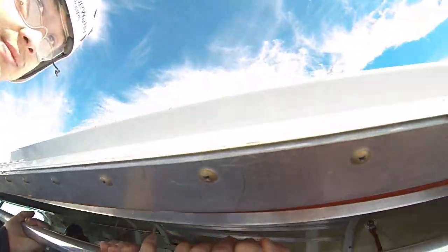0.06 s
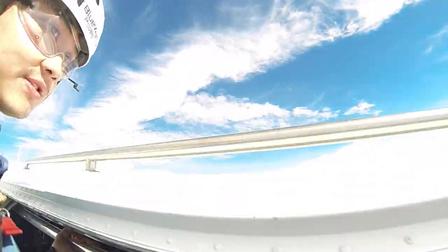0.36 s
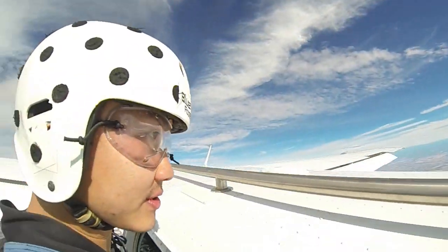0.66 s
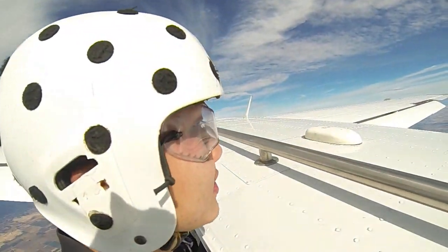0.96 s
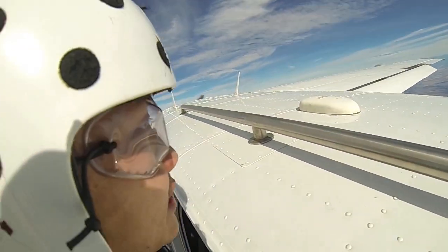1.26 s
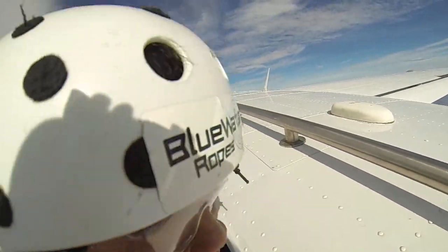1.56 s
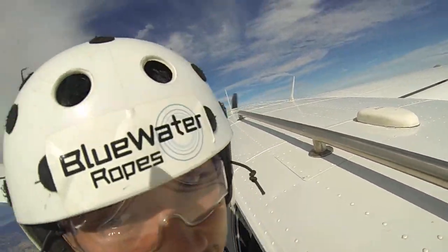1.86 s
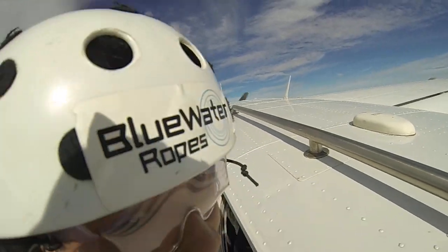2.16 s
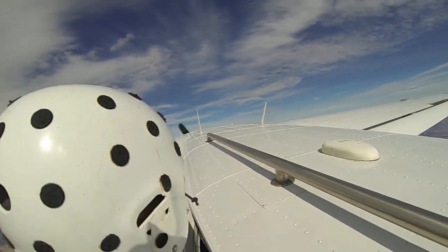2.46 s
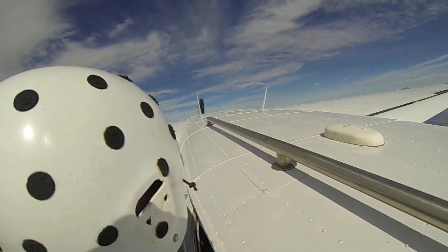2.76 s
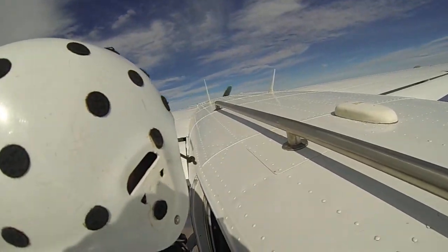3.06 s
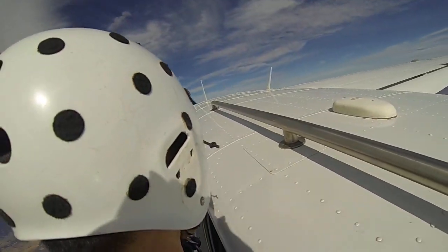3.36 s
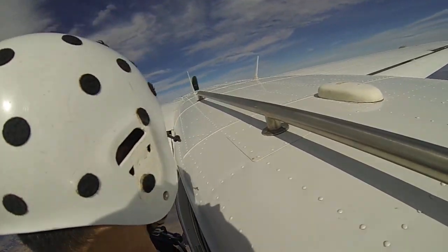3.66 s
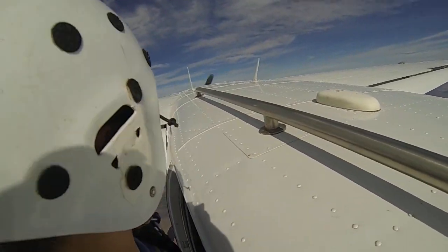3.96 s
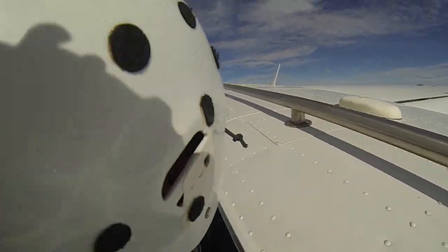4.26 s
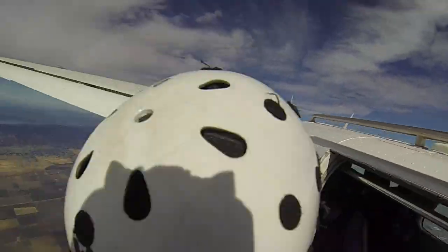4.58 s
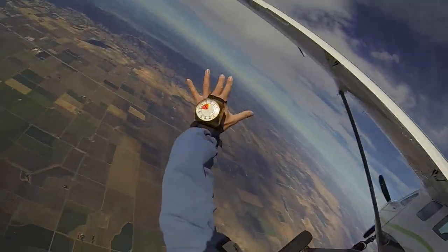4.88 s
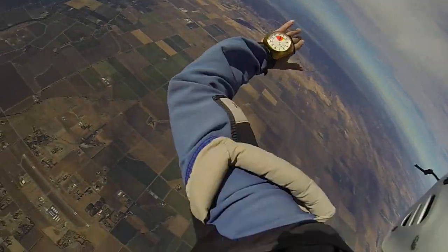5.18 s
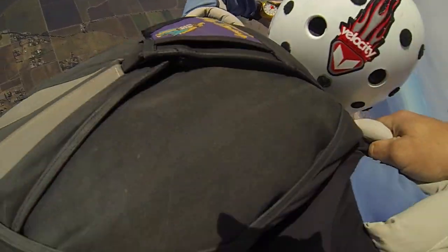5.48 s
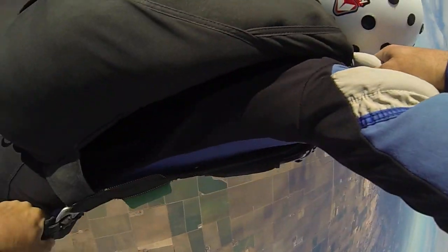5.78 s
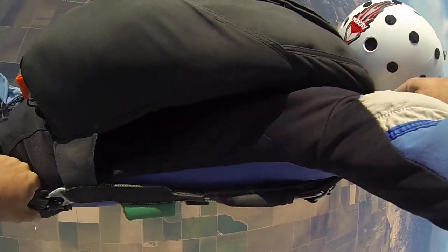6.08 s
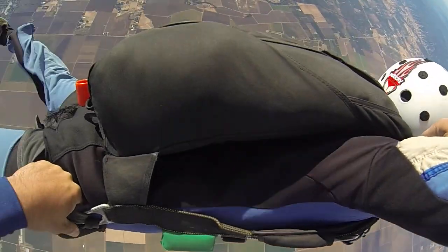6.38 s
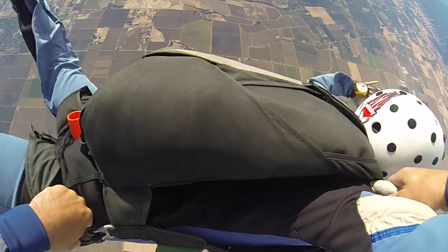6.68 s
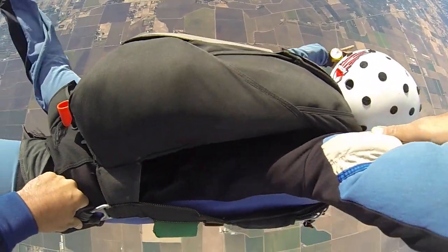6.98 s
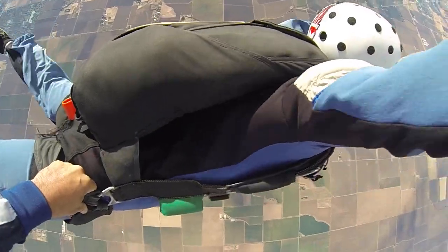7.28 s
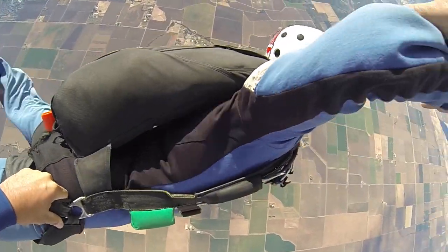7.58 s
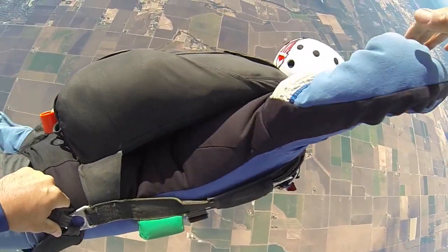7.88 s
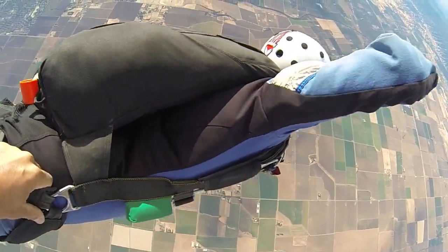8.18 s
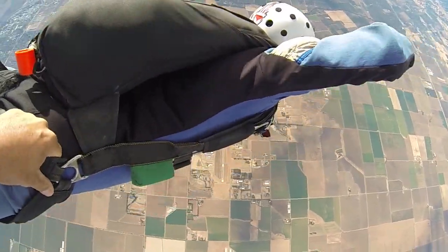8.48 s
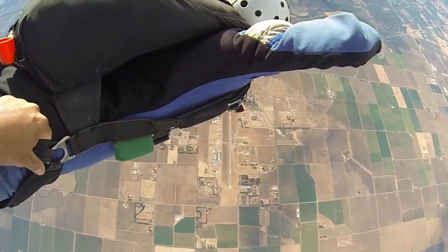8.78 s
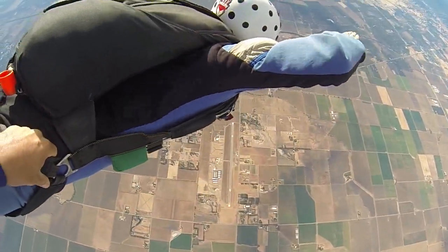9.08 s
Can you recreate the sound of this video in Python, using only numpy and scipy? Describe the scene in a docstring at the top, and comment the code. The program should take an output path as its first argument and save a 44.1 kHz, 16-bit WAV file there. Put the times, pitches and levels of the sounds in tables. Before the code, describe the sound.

Strong wind buffets a skydiver's microphone throughout, first in the airstream at a plane's door. Heavy low thumps pound over a flapping roar, with a run of crackling slaps of air in the first second. The wind eases briefly around 1 second, then builds again, with a rasping gust near 2.4 seconds and a few more isolated slaps. Around 4.8 to 5 seconds a bright burst of hiss flares up and the overloaded microphone chokes for an instant. At about 5.5 seconds, as free fall begins, the buffeting sinks to a rumble, the roar turns hollow and a brighter rush of air takes over. Raspy gusts hit near 5.9 and 6.2 seconds. The rush swells to its strongest around 7.7 seconds, then carries on unevenly, with short dips and surges, until the end at about 9 seconds.

```python
"""Wind buffets a skydiver's camera, first in the propeller's slipstream at the door, then in free fall.
Big eddies drive the microphone's diaphragm against its stops: heavy thumps over a flapping roar.
Small eddies ring the housing with rasp and hiss, and single hard ones slap it for a crackling edge.
After the exit, about five and a half seconds in, the buffeting sinks to a rumble,
the roar turns hollow and a brighter rush of air takes over."""
import sys
import numpy as np
from scipy import signal
from scipy.fft import rfft, irfft, next_fast_len
from scipy.io import wavfile
from scipy.ndimage import map_coordinates

SR = 44100
rng = np.random.default_rng(int(sys.argv[2]) if len(sys.argv) > 2 else 0)


def generate_wav(signal):
    """Clip the signal to [-1, 1] and save it as 16-bit WAV at the path in sys.argv[1]."""
    frames = np.transpose(np.atleast_2d(signal))
    scaled = np.clip(frames, -1, 1) * 32767
    pcm = np.round(scaled).astype(np.int16)
    wavfile.write(sys.argv[1], SR, pcm)


N = 403074

# Tone colours, each later normalised: f/Hz, relative level/dB
EDDY_SPECTRUM = [(8, -4), (40, 2), (100, 1), (170, -3.5), (280, -17), (500, -38.5), (1500, -83.5)]  # pressure of the big eddies at speed 1
RUMBLE_SPECTRUM = [(5, -29), (15, -11), (35, -3), (55, -6), (90, -12.5), (200, -26), (500, -97)]  # sub-bass bed
ROAR_SPECTRUM = [(100, -30.5), (200, 1), (290, -1), (420, 0), (540, -5), (720, -11.5), (1000, -17.5),
                 (2000, -51), (5000, -97)]  # broad low-mid body
HOLLOW_SPECTRUM = [(100, -21), (200, -8.5), (270, -5), (335, -7.5), (400, -3), (445, -1), (485, -9.5),
                   (560, -9.5), (680, -16.5), (1000, -25.5), (5000, -86.5)]  # the roar's hollow note
RASP_SPECTRUM = [(300, -25.5), (700, -6.5), (1000, -1), (1350, 2), (1750, -3.5), (2200, -8), (2700, -14.5),
                 (3600, -16), (4500, -27), (6500, -43), (8000, -45), (15000, -59)]  # midrange grit
HISS_SPECTRUM = [(900, -25.5), (1800, 8), (2700, 2), (3700, 4), (4500, -4.5), (6500, -9), (8000, -18.5),
                 (10500, -21.5), (13500, -29), (15000, -32.5)]  # airy top
# Tone colour of the wind, broad peaks and one narrow notch near 1340 Hz: f/Hz, width/Hz, gain/dB
WIND_EQ = [(1343, 8.6, -3.5), (1600, 390, 4.5), (3300, 900, 2.5), (5140, 700, 7.5), (6900, 840, 2.5),
           (9700, 1500, 3), (13200, 1600, 4.5)]
# How fast the big eddies follow each other: t/s, speed/ratio
EDDY_SPEED = [(0, .9), (1.05, .78), (1.3, 1), (1.9, 1.02), (2.15, 1.2), (2.38, .92), (2.6, 1.1),
              (4.2, 1.16), (5, .7), (5.35, 1.1), (5.6, .65), (6.2, .85), (6.6, .65), (7.3, .78), (7.9, 1.1),
              (8.35, 1.3), (8.55, .76), (9.14, .8)]
# Wind strength as the skydiver leans in and out of the slipstream: t/s, level/dB
SLIPSTREAM_WIND = [(0, 5.5), (0.45, 0.6), (0.62, 1), (0.82, -2.5), (0.93, -9), (1.13, -7.5), (1.3, -2),
                   (2.2, -1.6), (2.6, 2), (3.2, 3.5), (3.5, -3.5), (3.72, 3.5), (3.98, 2.5), (4.2, -3),
                   (4.6, 2.5), (5.15, -3.0), (5.45, 6.5)]
# Wind strength in free fall: t/s, level/dB
FREE_FALL_WIND = [(5.45, -12.5), (5.65, -6.5), (6.45, -2), (6.72, 0), (6.8, -3), (7.15, 3.5), (7.33, -1),
                  (7.65, 10), (7.9, 5), (8.2, 0.5), (8.6, 0), (8.9, -4), (9.14, 5)]
# How broken the flow is: t/s, roughness (a unit gives about half a dB of burst depth)
TURBULENCE = [(0, 6), (.45, 9.5), (.8, 5.8), (.95, 4), (2.3, 2.5), (4.6, 4.5), (4.92, 2), (5.15, 7),
              (5.55, 4), (7.2, 2.5), (9.14, 4)]
# Gusts catch the housing's edge: start/s, end/s, rasp/dB, hiss/dB, roar/dB, buffeting/dB
GUSTS = [(0.187, 0.254, 1, 1.5, 1.5, -0.5), (0.598, .63, 4, 2, 9, 2.5),
         (1.165, 1.279, -2.5, -1.5, 3.5, 1.5), (1.545, 1.615, -2, 1.5, 5, 1), (2.287, 2.481, 8.5, 5, 5, -1),
         (4.272, 4.366, -2.5, -1.5, 2, -0.5), (4.762, 4.9, 3, 8.5, -4.5, -1),
         (4.892, 4.951, 1, 14.5, -6, 5), (4.948, 5.075, -0.5, 11, -8, 1), (5.381, 5.44, 4, 3.5, 4, 0.5),
         (5.831, 5.986, 7, 6, 7, 2), (6.201, 6.28, 8.5, 5, 5, 0.5), (6.351, 6.387, -3, 2.5, 3, -1.5),
         (7.898, 8.181, 3, 5, 0.5, 1), (8.227, 8.276, 7, 3.5, -2, 3.5), (8.397, 8.806, 0, 1.8, 0, -.5),
         (8.964, 9.125, -2, 1, 2, 3)]
# Brief dropouts and dips in the wind noise, the deepest where the overloaded microphone chokes:
# t/s, half length/s, rush/dB, roar/dB, buffeting/dB
DROPOUTS = [(.07, .09, -.5, -3, -1.5), (.97, 0.079, 0, -2.5, -1), (1.09, .018, -5, -10.5, -1),
            (2.7, .2, 0, 1.5, -2), (2.53, 0.021, -0.5, 4, -4), (4.2, .04, 0, -3.5, 0.5),
            (4.53, 0.036, 0, -12.5, -3.5), (4.65, .025, -10, -3, 1.5), (4.91, 0.018, 0, 1, -16),
            (5.032, 0.0097, -14, -16, -27), (5.803, .005, -7.5, -11, -3), (6.015, 0.037, -8, -4.5, -1),
            (6.11, .035, -2.5, -1.5, -9), (6.31, 0.023, -5, -0.5, -7), (6.41, .011, -8, 0, -8),
            (6.81, 0.033, -3, 0, -1), (7.11, 0.0074, -9, -5, 0), (7.372, .014, -8, -1, -12),
            (7.868, .014, -9, -16, -6), (8.208, 0.0092, -3, -6, -8), (8.35, 0.051, 1.5, -7.5, -3.5),
            (8.88, 0.026, -2, -2, -6.5)]
# Single hard eddies hit the housing: t/s, level/dB (before the crack and suction trims)
SLAPS = [(0.1935, -13), (0.3005, -13), (0.3629, -15), (0.4588, -21), (0.486, -21), (0.5401, -12.5),
         (0.6049, -11.5), (0.6736, -15), (0.7148, -11.5), (0.7491, -12), (0.784, -18.5), (0.819, -11),
         (2.379, -12.5), (2.4496, -12), (2.962, -14), (3.9802, -16.5), (4.8595, -16), (5.0672, -14)]
# Faders riding eddy speed, a slipstream row then a free-fall row: level/dB, slope/(dB per octave)
BUFFET_FADER = [(-14.5, 1.8), (-21, 5.1)]
RUMBLE_FADER = [(-21, -11), (-18.5, -7)]
SHEEN_FADER = [(0.024, -2), (-1.4, -8.5)]  # treble shelf on the hiss
# Faders riding wind strength, the same two rows: level/dB, slope/(dB per dB)
ROAR_FADER = [(-26.5, 0.79), (-26, 0.63)]
RASP_FADER = [(-35.6, 1), (-27.5, 0.86)]
HISS_FADER = [(-46, 1.26), (-31, 0.58)]

EXIT_S, EXIT_FADE_S = 5.46, 0.017  # the camera leaves the aircraft's wake


def overload(speed, drive):
    """Big eddies of changing speed push the diaphragm against its stops."""
    pressure = map_coordinates(noise(EDDY_SPECTRUM), [np.cumsum(speed)], order=1, mode="mirror")
    return np.tanh(drive * pressure)


def buffet(diaphragm, speed_octaves, leak_hz, vent_hz, round_hz):
    """Each swing of the overloaded diaphragm is a rounded thump that leaks away through the vents."""
    def response(hz):
        leaks = 1j * hz / (leak_hz + 1j * hz) * 1j * hz / (vent_hz + 1j * hz)
        return leaks / (1 + 1j * hz / round_hz) ** 2

    # the big eddies fade gradually as the aircraft recedes
    gain = ride(BUFFET_FADER, speed_octaves, at_s=5.31, fade_s=0.15)
    throb = amp(1.15 * wobble(rate_hz=15))
    return gain * throb * unit(filtered(diaphragm, response))


def rumble(speed_octaves):
    """Softly saturated sub-bass swells as the eddies slow down."""
    return ride(RUMBLE_FADER, speed_octaves) * unit(np.tanh(0.48 * noise(RUMBLE_SPECTRUM)))


def roar(flapping, roughness):
    """Flapping air roars in the housing: broad beside the aircraft, hollow in open air."""
    hollow_share = crossfade(0.057, 0.93)
    broad = housing(bursts(flapping, depth_db=0.5 * roughness), ROAR_SPECTRUM)
    hollow = housing(bursts(flapping, depth_db=3.0), HOLLOW_SPECTRUM)
    return np.sqrt(1 - hollow_share) * broad + np.sqrt(hollow_share) * hollow


def rush(diaphragm, flapping, roughness, rasp_gain, hiss_gain, sheen_gain, shelf_hz):
    """Small eddies tear past in bursts shared by rasp and hiss."""
    # fine sound gets through best while the diaphragm is clear of its stops
    choked_share = crossfade(0.73, 0.07)
    passing = np.sqrt(1 - choked_share + choked_share * unit(1 - diaphragm ** 2) ** 2)
    rasp = rasp_gain * housing(passing * bursts(flapping, 0.52 * roughness), RASP_SPECTRUM)
    hiss = hiss_gain * housing(passing * bursts(flapping, 0.55 * roughness), HISS_SPECTRUM)
    # slow eddies leave the top edge keen, fast ones blunt it
    sheen = filtered(hiss, lambda hz: hz ** 6 / (hz ** 6 + shelf_hz ** 6))
    return rasp + hiss + (sheen_gain - 1) * sheen


def slaps(crack_db, crack_t60_s, suction_db, suction_s):
    """A hard eddy is a crack that rings the housing and one swing of suction."""
    t = np.arange(SR // 20) / SR
    cracks, suction = np.zeros((2, N + SR))
    age = t / suction_s
    swing = age * (2 - age) * np.exp(-age)
    for at_s, db in SLAPS:
        start = round(at_s * SR)
        envelope = amp(db + crack_db - 60 * t / crack_t60_s)
        cracks[start:start + len(t)] += envelope * rng.standard_normal(len(t))
        suction[start:start + len(t)] -= amp(db + suction_db) * swing
    return housing(cracks, RASP_SPECTRUM) + suction[:N]


def swirl(flap_hz, tear_hz):
    """The flow flaps on and off, with small tearing eddies inside each flap."""
    swings = unit(wobble(flap_hz) + wobble(tear_hz))
    return unit(np.tanh(swings / 2))


def bursts(flapping, depth_db):
    """White noise flares with each flap, trimmed to a roughly steady mean power."""
    trim = np.exp(np.log(amp(depth_db)) ** 2)
    return rng.standard_normal(N) * amp(depth_db * flapping) / trim


def gusts(edge_s, build):
    """Each gust steps in, builds and lets go abruptly: gains for rasp, hiss, roar and buffeting."""
    t, rows = np.arange(N) / SR, np.array(GUSTS)
    shapes = []
    for start, end in rows[:, :2]:
        gate = np.clip(0.5 + np.minimum(t - start, end - t) / edge_s, 0, 1)
        progress = (t - start) / (end - start)
        shapes.append(gate * (1 + build * (progress - 0.5)))
    return amp(rows[:, 2:].T @ shapes)


def dips(rows):
    """Brief bell-shaped level moves, mostly dips: one gain curve per dB column."""
    t, rows = np.arange(N) / SR, np.array(rows)
    bells = [1 / (1 + ((t - at_s) / half_s) ** 4) for at_s, half_s in rows[:, :2]]
    return amp(rows[:, 2:].T @ bells)


def housing(air, spectrum, size=8192):
    """Air on the housing takes the layer's tone colour plus the wind's broad peaks and narrow notch."""
    hz = np.fft.rfftfreq(size, 1 / SR)
    eq_db = sum(db / (1 + (2 * (hz - centre) / width) ** 2) for centre, width, db in WIND_EQ)
    cepstrum = irfft(np.log(amp(level_at(spectrum, hz) + eq_db)))
    # fold to minimum phase so the ring follows the hit
    cepstrum[1:size // 2] *= 2
    cepstrum[size // 2 + 1:] = 0
    ring = irfft(np.exp(rfft(cepstrum)))
    return signal.fftconvolve(air, ring / np.linalg.norm(ring))[:N]


def crossfade(slipstream, free_fall, at_s=EXIT_S, fade_s=EXIT_FADE_S):
    """One value beside the aircraft gives way to another at the exit."""
    fallen = (1 + np.tanh((np.arange(N) / SR - at_s) / fade_s)) / 2
    return (1 - fallen) * slipstream + fallen * free_fall


def ride(fader, control, **timing):
    """A layer's gain follows a control, with one level and slope before the exit and one after."""
    return amp(crossfade(*[db + slope * control for db, slope in fader], **timing))


def automation(points):
    """Join (time, value) points into one value per sample."""
    return np.interp(np.arange(N) / SR, *np.transpose(points))


def wobble(rate_hz):
    """A smooth random curve of rms 1 with rate_hz knots a second."""
    knots = rng.standard_normal(int(N * rate_hz / SR) + 4)
    return unit(map_coordinates(knots, [np.arange(N) * rate_hz / SR]))


def noise(spectrum):
    """Coloured noise of rms 1."""
    return unit(filtered(rng.standard_normal(N), lambda hz: amp(level_at(spectrum, hz))))


def filtered(x, response):
    """Shape x with a complex frequency response."""
    size = next_fast_len(N + SR // 2)
    return irfft(rfft(x, size) * response(np.fft.rfftfreq(size, 1 / SR)), size)[:N]


def level_at(spectrum, hz):
    """Read a spectrum's dB along a log frequency axis."""
    points_hz, db = np.transpose(spectrum)
    return np.interp(np.log(hz + 1), np.log(points_hz + 1), db)


def amp(db):
    """Decibels to gain."""
    return 10 ** (np.asarray(db) / 20)


def unit(x):
    """Scale to rms 1."""
    return x / np.sqrt(np.mean(x ** 2) + 1e-20)


def scene():
    """The mix: eddy speed trades rumble for buffets, wind strength drives the roar and the rush."""
    strength_db = crossfade(automation(SLIPSTREAM_WIND), automation(FREE_FALL_WIND))
    strength_db += 0.55 * wobble(rate_hz=18)  # the wind never holds still
    speed = automation(EDDY_SPEED)
    speed_octaves = np.log2(speed)
    roughness = automation(TURBULENCE)
    diaphragm = overload(speed, drive=2.36)
    flapping = swirl(flap_hz=175, tear_hz=650)
    rasp_gust, hiss_gust, roar_gust, buffet_gust = gusts(edge_s=0.0089, build=0.44)
    rush_dip, roar_dip, buffet_dip = dips(DROPOUTS)
    # roar and rush duck for an instant ahead of each slap
    duck, = dips([(at_s - 0.006, 0.005, -6) for at_s, _ in SLAPS])

    thumps = buffet(diaphragm, speed_octaves, leak_hz=74, vent_hz=31.2, round_hz=1230)
    buffeting = buffet_gust * buffet_dip * (thumps + rumble(speed_octaves))
    body = roar_gust * ride(ROAR_FADER, strength_db) * roar(flapping, roughness)
    top = rush(diaphragm, flapping, roughness,
               rasp_gain=rasp_gust * ride(RASP_FADER, strength_db),
               hiss_gain=hiss_gust * ride(HISS_FADER, strength_db),
               sheen_gain=ride(SHEEN_FADER, speed_octaves), shelf_hz=5200)
    hits = slaps(crack_db=-8.5, crack_t60_s=0.016, suction_db=7.0, suction_s=0.0013)
    return buffeting + duck * (roar_dip * body + rush_dip * top) + hits


def record(dry):
    """The camera rounds off the highest peaks and keeps nothing above its band limit."""
    ceiling, top_hz = 0.95, 15200
    rounded = dry / (1 + np.abs(dry / ceiling) ** 8) ** (1 / 8)
    return filtered(rounded, lambda hz: hz < top_hz)


dry = scene()
out = record(dry)
generate_wav(out)
```